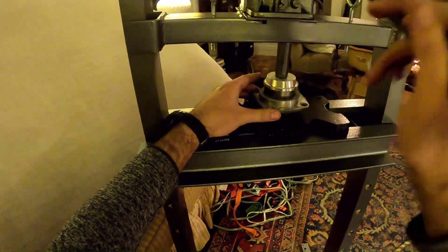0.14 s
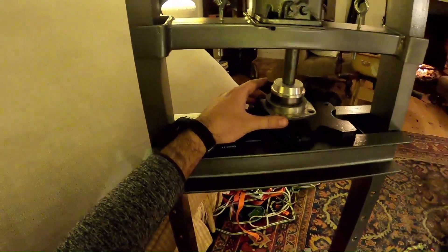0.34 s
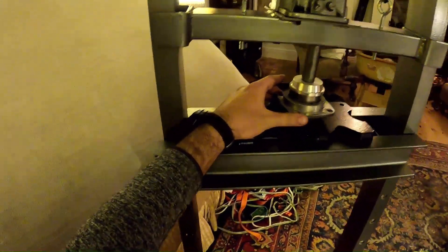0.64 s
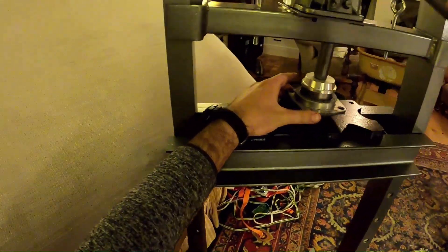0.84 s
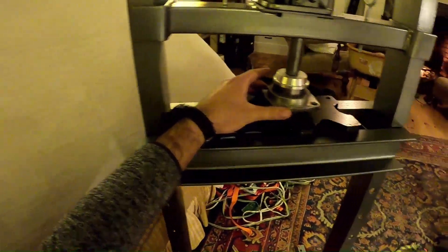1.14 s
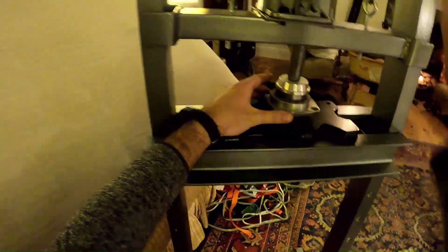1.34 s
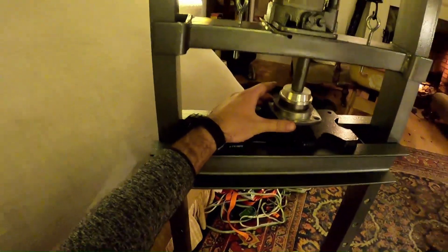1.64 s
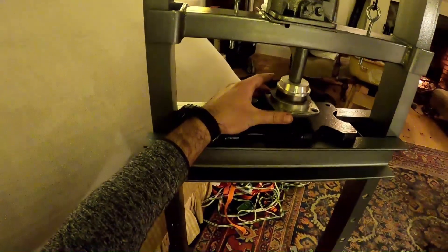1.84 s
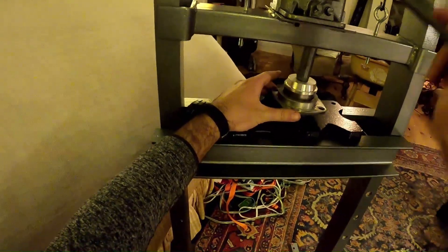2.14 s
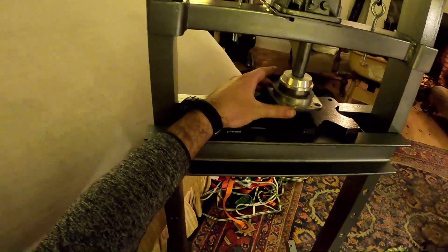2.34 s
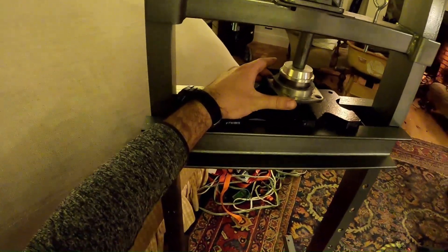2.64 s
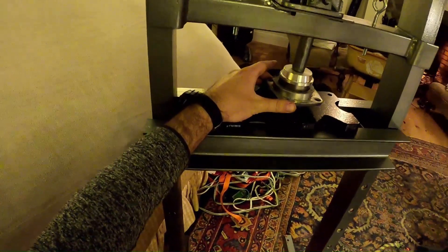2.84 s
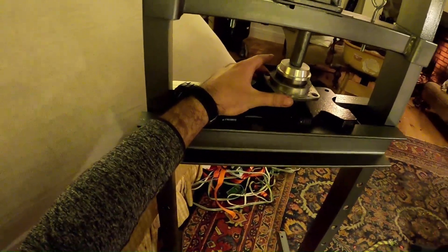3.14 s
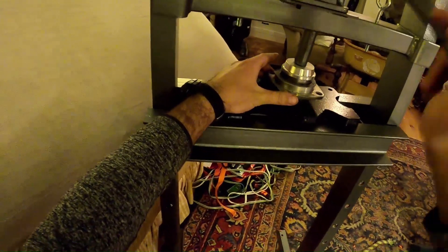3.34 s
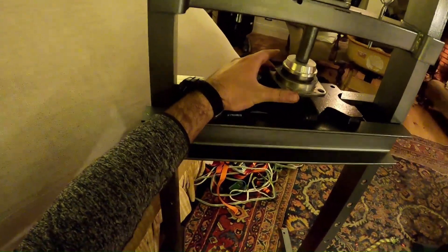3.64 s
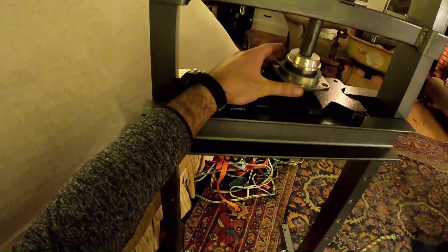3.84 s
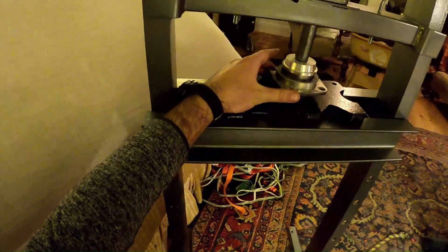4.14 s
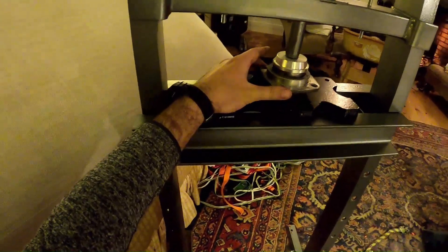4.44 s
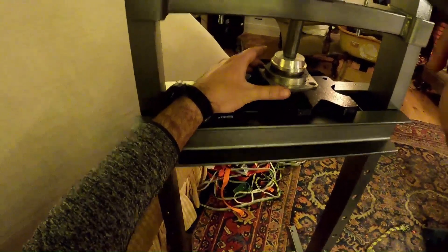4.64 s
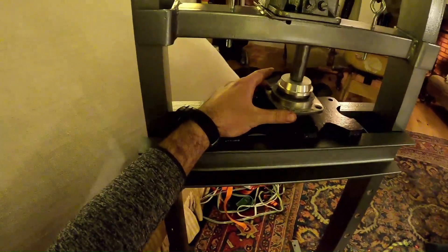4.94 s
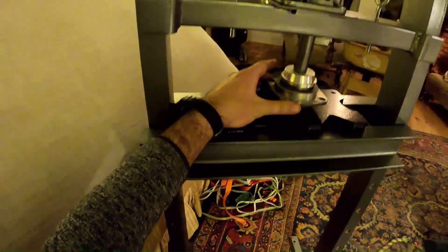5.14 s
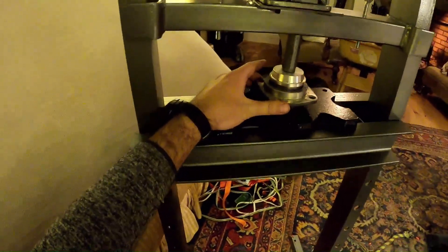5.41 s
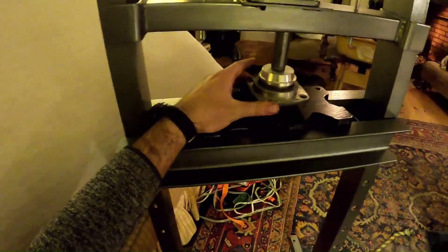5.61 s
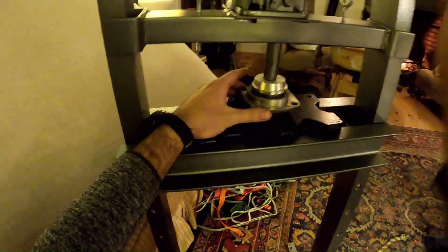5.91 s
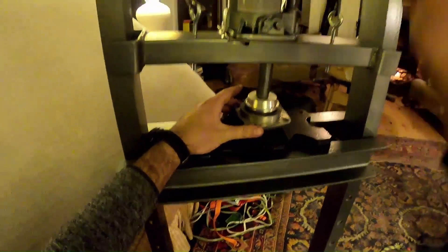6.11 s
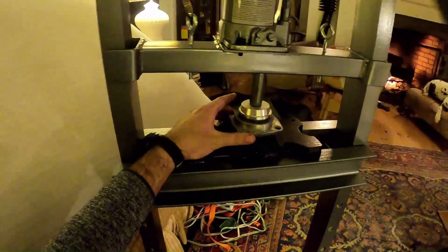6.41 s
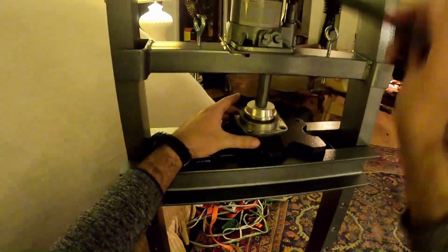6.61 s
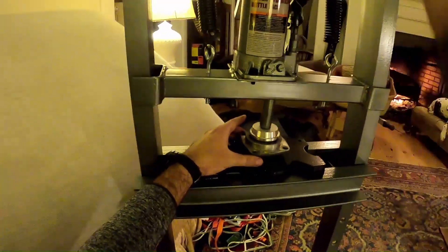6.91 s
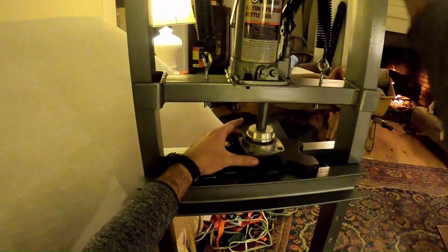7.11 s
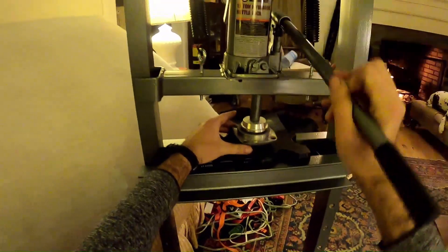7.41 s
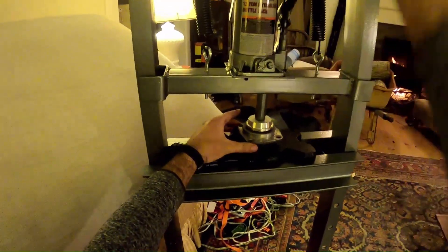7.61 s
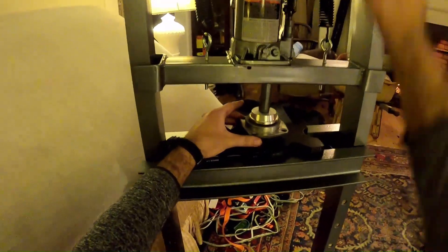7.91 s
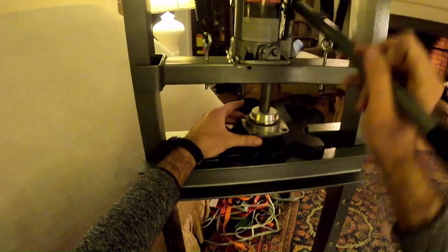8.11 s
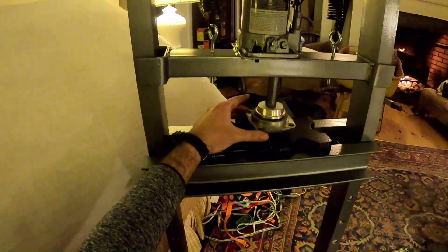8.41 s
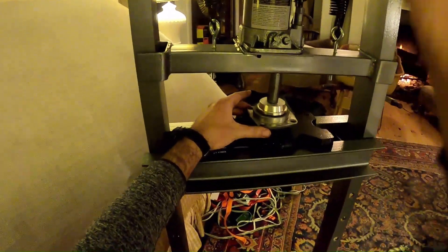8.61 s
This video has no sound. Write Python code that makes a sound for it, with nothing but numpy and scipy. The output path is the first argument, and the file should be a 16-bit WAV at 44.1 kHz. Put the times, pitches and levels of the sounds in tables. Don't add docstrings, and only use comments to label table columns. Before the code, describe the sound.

Close up in a furnished room, a bottle jack on a steel press is pumped by hand. Each stroke starts with a bright double clack, then a dull thud into the frame, a loose handle clack with a rattle, and a dry clack at the bottom. Faint oil hiss, thin whistles and low floor thumps run beneath, over quiet room tone. Stereo, treble brighter on the right.

```python
import sys
import numpy as np
from scipy import signal
from scipy.fft import rfft, irfft
from scipy.io import wavfile
from scipy.ndimage import uniform_filter1d

SR = 44100
rng = np.random.default_rng(int(sys.argv[2]) if len(sys.argv) > 2 else 0)


def attenuation_scalar(level_db):
    decades = np.asarray(level_db, float) / 20
    return 10 ** decades


def digitize_waveform(pressure):
    field = np.atleast_2d(pressure).T
    bounded = np.clip(field, -1, 1)
    quanta = np.round(bounded * 32767).astype(np.int16)
    wavfile.write(sys.argv[1], SR, quanta)


N = 386302

# frequency in Hz, density in dB per Hz.
ROOM_TONE = [(12, -11), (20, 6), (59, 24.5), (433, 8), (603, 18.5), (1270, 13), (1830, -14), (3970, -32),
             (8620, -41), (15000, -40)]
# time in seconds, level in dB.
OIL_FLOW = [(0.0, -35.5), (0.24, -49.5), (0.85, -52), (2.14, -48.5), (2.63, -53.5), (2.78, -46),
            (4.05, -52.5), (5.85, -59), (6.07, -36.5), (6.29, -55), (7.98, -48.5), (8.15, -42),
            (8.44, -53.5), (8.76, -36)]
# time in seconds, clack in dB, bounce delay in ms, bounce clack in dB, bounce blow in dB.
TOPS = [(0.0155, -13.5, 9.6, -15, -34), (.6805, -13, 12.1, -15, -38), (1.3339, -32.5, 8.5, -27, -40),
        (1.9962, -12, 12.2, -14.5, -35.5), (2.6162, -12.5, 11, -13.5, -35.5),
        (3.2607, -12.5, 11.2, -14.5, -37.5), (3.8912, -14, 12.1, -13, -35.5), (4.5363, -13, 13, -18, -36.5),
        (5.2081, -12.5, 11.5, -20, -33.5), (5.867, -12, 13, -15, -31.5), (6.5279, -15.5, 28.3, -11.5, -33),
        (7.2413, -14, 9.7, -13.5, -32), (7.934, -14, 5.4, -17, -32), (8.6141, -12.5, 10.5, -14, -34.5)]
# time in seconds, clack in dB, frame blow in dB, contact in ms.
THUDS = [(.209, -19, -28.5, 5.6), (0.985, -30.5, -41.5, 8.1), (.997, -26.5, -44, 5.9),
         (1.549, -28, -31.5, 3), (2.1835, -21.5, -31, 12), (2.817, -24, -30.5, 5.1),
         (3.4545, -19.5, -32, 4.9), (4.156, -22, -38.5, 20), (4.7554, -37, -40, 7.5),
         (5.4899, -26.5, -47, 23), (6.0974, -48, -35.5, 3.6), (6.7845, -50, -37, 3),
         (7.5336, -28, -40.5, 4), (8.1323, -22, -24.5, 13), (8.1582, -21.5, -30.5, 4.1)]
# time in seconds, clack in dB, frame blow in dB, contact in ms, graze in dB.
CATCHES = [(.28, -14.5, -36, 9.5, -33), (1.039, -21.5, -44, 5.7, -33), (1.6148, -13, -41, 7, -39),
           (2.2456, -16, -39, 5.9, -30), (2.8795, -13.5, -46.5, 7, -30), (3.5103, -12, -38, 7.7, -33),
           (4.1662, -17.5, -46, 8.2, -41), (4.8084, -14.5, -44.5, 5.9, -24.5),
           (5.5009, -16.5, -40.5, 5.9, -39), (6.159, -13.5, -39.5, 5.9, -27),
           (6.8441, -17.5, -38.5, 8.4, -34), (7.5424, -16.5, -36, 15, -39), (8.1973, -16, -33.5, 8.9, -28)]
# time in seconds, clack in dB, frame blow in dB, contact in ms.
RATTLES = [(.3505, -23, -43.5, 7.3), (1.395, -26.5, -45, 5.6), (1.6551, -30, -43, 13),
           (1.676, -25, -47.5, 9), (2.2942, -26, -44.5, 6.5), (2.9306, -23, -45.5, 8.1),
           (3.558, -24, -44.5, 9.2), (4.1988, -28, -46.5, 15), (4.8417, -19.5, -41, 4.5),
           (5.5365, -18.5, -42.5, 5), (6.2044, -17, -45.5, 4.1), (6.8861, -20.5, -41, 6.2),
           (7.98, -27, -45, 6.5), (8.181, -30, -51, 4.1), (8.2424, -17.5, -36, 3.1),
           (8.2488, -25.5, -40.5, 22)]
# time in seconds, clack in dB, frame blow in dB, socket ping in dB.
BOTTOMS = [(0.458, -21, -45.5, 4), (1.1431, -21, -43.5, 0), (1.7687, -15, -42.5, 3), (2.3747, -28, -46, 9),
           (2.9994, -14.5, -43.5, 2.5), (3.6449, -13, -44, 2.5), (4.265, -17, -44, 0),
           (4.9019, -18, -48.5, 5.5), (5.5925, -13, -50.5, 5), (6.2781, -14.5, -41, -4),
           (6.9723, -11.5, -39.5, 0), (7.6392, -28.5, -44.5, 4), (8.3348, -22.5, -40, 5)]
# time in seconds, clack in dB.
TICKS = [(0.6351, -48), (.9377, -43), (1.2606, -46), (1.9149, -49), (1.9913, -39), (2.5727, -43),
         (3.178, -45.5), (3.254, -33.5), (3.8132, -50), (3.887, -39), (4.3285, -40), (4.3809, -45),
         (5.109, -59), (5.1331, -37.5), (5.2025, -28.5), (5.7348, -44.5), (5.8084, -48), (5.8153, -48),
         (6.488, -52), (6.5003, -45.5), (7.236, -32), (7.7677, -43.5), (8.608, -30)]
# time in seconds, clack in dB.
SLACK = [(0.641, -27.5), (1.9595, -29), (2.5811, -29.5), (3.2214, -37), (3.848, -31.5), (4.4994, -30.5),
         (5.1698, -29), (5.83, -29), (6.5115, -34.5), (7.1972, -35), (7.8913, -33), (8.571, -40)]
# frequency in Hz, width in Hz, level in dB.
LINKAGE = [(1950, 390, -12), (2360, 222, 1.5), (2514, 187, 2), (3176, 560, -0.5), (4056, 486, 2.5),
           (4447, 700, -2.5), (5190, 720, -8), (5980, 500, -5.5), (6590, 1100, -13.5), (8590, 900, -18.5),
           (10580, 420, -29), (12900, 4300, -37)]
# frequency in Hz, T60 in seconds, level in dB at the top, in the socket, at the bottom.
TUBE = [(2400, 0.31, -8, -2, -6), (2570, 0.3, -5.5, 0, -6.5), (3280, .3, -9, -9.5, -6),
        (3570, 0.16, -9.5, -12, 2), (3820, 0.33, -6.5, -1, -3), (4190, 0.42, -3, -8, -8.5),
        (4250, 0.35, -7.5, -7, -5), (5100, .26, -6, -10, -13.5), (5850, 0.17, 0, 3, 4),
        (6860, .21, -3, 4, 7), (7910, .2, 5, 8, 7), (9690, .16, 2, 17, 7), (11360, .12, 13.5, -1, 6),
        (12280, .1, 11, 3, 12)]
# frequency in Hz,
# level in dB, T60 in seconds.
FRAME_MODES = [(62.6, -3.5, 0.36), (83, -6, 0.43), (135.3, -23.5, 0.35), (189, -7.5, 0.32),
               (250, -4, 0.36), (295.7, -5.5, 0.29), (417, -7.5, 0.21), (550, -9, 0.58), (635, 5, 0.057),
         (780, 3.5, 0.24), (844, -8, 1), (950, 0, 0.42), (990, -10, 0.53), (1213, 6.5, 0.089),
         (1262, -0.5, 0.24), (1450, -4.5, 0.55), (1663, -8.5, 0.23), (1600, 4, 0.18)]
# frequency in Hz, level in dB, T60 in seconds.
BED = [(297.6, -6, 0.03), (458, -12.5, 0.057), (602.6, -1, 0.037), (712, -7, 0.077), (903, 3, 0.031),
       (1030, 4, 0.017), (1178, -2.5, 0.03), (1320, 2.5, 0.028), (1534, -4.5, 0.04), (1774, -6, 0.06),
       (1934, -4, 0.027), (2210, -4.5, 0.032), (2763, -2.5, 0.022), (3276, -2.5, 0.0053)]
# frequency in Hz, level in dB, T60 in seconds.
RAM = [(290, -11.5, 0.21), (372, -4.5, 0.11), (428, -13.5, 0.069), (1400, -5, .2), (1543, 1, .062),
       (1650, 6.5, 0.15), (1920, -12, .05), (2104, -4.5, 0.1), (2620, -0.5, 0.19), (2960, 5, 0.11),
       (3350, 3, 0.044)]
# frequency in Hz, T60 in seconds.
ROOM_T60 = [(200, 0.5), (1000, 0.39), (3000, 0.51), (8000, 0.4), (12000, 0.29)]
# time in seconds, level in dB, T60 in seconds.
THUMPS = [(0.23, -27, 0.48), (0.672, -43, 0.41), (0.99, -48.5, 1.1), (1.574, -28, 0.52), (2.216, -26, 0.36),
          (2.839, -30.5, 0.55), (3.274, -53, 1), (3.482, -29, 0.47), (4.521, -50, 0.62), (4.79, -48, 0.88),
          (5.196, -38, 0.3), (5.862, -49, 0.42), (6.558, -48, 0.47), (6.843, -41, 0.51), (7.928, -65, 2.1),
          (8.149, -27, 0.48)]
# start and end in seconds, first and last frequency in Hz, level in dB.
WHISTLES = [(0.26, 0.413, 1780, 1790, -47), (.46, .6, 1454, 1490, -52), (1.422, 1.575, 1450, 1710, -53),
            (2.41, 2.58, 1306, 1290, -56), (3.03, 3.166, 1500, 1520, -52), (3.276, 3.438, 1595, 1620, -50),
            (5.94, 6.13, 1276, 1624, -46), (6.11, 6.16, 1700, 1710, -57), (6.697, 6.83, 1510, 1740, -52),
            (7.3, 7.523, 1460, 1400, -55.5), (7.652, 7.857, 1465, 1500, -51.5),
            (7.993, 8.12, 1400, 1400, -55)]
# frequency in Hz, gain in dB.
HOUSING = [(10200, -2), (10900, -17.5), (14500, -18), (15300, -19), (15800, -45)]
# frequency in Hz, gain in dB.
LEFT_DB = [(25, -15.5), (90, -11), (180, -1), (600, 1.6), (1300, -1.3), (2500, -5.4), (4700, -11.3),
           (9000, -12), (11000, -8), (12200, 0)]
# frequency in Hz, lead in radians.
LEFT_TURN = [(90, .3), (180, 1.0), (300, 1.2), (1500, 1.22), (4700, 1.44), (6000, 2.2), (10000, 2.4),
             (13000, 3.2)]
# frequency in Hz, likeness from 0 to 1.
LEFT_SAME = [(40, .65), (110, .55), (240, .98), (3500, .96), (5000, .75), (9000, .55), (11000, .3),
             (15000, .2)]


def evened(x):
    return x / np.sqrt(np.mean(x ** 2) + 1e-20)


def read(points, hz):
    f, value = np.transpose(points)
    return np.interp(np.log(hz + 1), np.log(f + 1), value)


def add(mix, s, sound):
    part = mix[round(s * SR):][:len(sound)]
    part += sound[:len(part)]


def coloured(points):
    hz = np.fft.rfftfreq(N, 1 / SR)
    return evened(irfft(rfft(rng.standard_normal(N)) * attenuation_scalar(read(points, hz)), N))


def room_tone():
    return attenuation_scalar(-56.5) * np.array([coloured(ROOM_TONE), coloured(ROOM_TONE)])


def oil_hiss():
    s, db = np.transpose(OIL_FLOW)
    hiss = coloured([(300, -8.0), (550, -22.5), (1000, 2.5), (1500, 3.0), (2000, -9.5), (5000, -17), (9000, -37)])
    return attenuation_scalar(np.interp(np.arange(N) / SR, s, db) - 4) * hiss


def contact(place, s, clack_db, blow_db, ping_db, ms, room_db):
    return place, s, clack_db, blow_db, ping_db, ms, room_db


def contacts():
    top, socket, bottom = range(3)
    hits = [contact(bottom, s, db, blow_db, ping_db=0.5, ms=ms, room_db=-19)
            for s, db, blow_db, ms in THUDS]
    for s, db, after_ms, bounce_db, blow_db in TOPS:
        bounce_s = s + after_ms / 1000
        hits += [contact(top, s, db, db - 24.5, ping_db=-0.8, ms=3.46, room_db=-12),
                 contact(top, bounce_s, bounce_db, blow_db, ping_db=-2, ms=3.34, room_db=-15)]
    for s, db, blow_db, ms, graze_db in CATCHES:
        hits += [contact(socket, s, db, blow_db, ping_db=-3, ms=ms, room_db=-16.5),
                 contact(socket, s - .0098, graze_db, graze_db - 16, ping_db=2, ms=15, room_db=-19)]
    hits += [contact(socket, s, db, blow_db, ping_db=-3, ms=ms, room_db=-17)
             for s, db, blow_db, ms in RATTLES]
    hits += [contact(bottom, s, db, blow_db, ping_db=ping_db, ms=4.4, room_db=-18)
             for s, db, blow_db, ping_db in BOTTOMS]
    hits += [contact(top, s, db, db - 25, ping_db=-1.5, ms=9.2, room_db=-13) for s, db in SLACK]
    hits += [contact(top, s, db, db - 12.5, ping_db=7.5, ms=6.1, room_db=-18) for s, db in TICKS]
    return hits


def whitened(x, share):
    z = rfft(x)
    return z / (abs(z) + 0.45 * abs(z).mean(-1, keepdims=True)) ** share


def clack(db, ping_db, ms, dull_db, chance):
    t, hz = np.arange(2048) / SR, np.fft.rfftfreq(2048, 1 / SR)
    attack = np.minimum(t / 0.00039, 1)
    scrape = chance * abs(chance) ** 0.2 * attack * attenuation_scalar(-9 * t * 1000 / ms)
    body = power = 0
    for k, (f, width, level_db) in enumerate(LINKAGE):
        flat_db = ping_db * np.interp(f, [2400, 2600, 3100], [1.6, .3, -.3])
        varied_db = 2.47 * chance[0, -1 - k]
        soft_db = dull_db * max(np.log2(f / 4100), 0)
        mode = attenuation_scalar(level_db + flat_db + varied_db + soft_db) / (1 + 2j * (hz - f) / width)
        body = body + (-1) ** k * mode
        power = power + abs(mode) ** 2
    x = irfft(whitened(scrape, 0.56) * body)
    smooth = irfft(np.sqrt(power) * body / abs(body))
    x *= attenuation_scalar(db) / np.sqrt(uniform_filter1d(x ** 2, 100).max(-1, keepdims=True))
    return x, smooth * np.linalg.norm(x[0]) / np.linalg.norm(smooth)


def blow(db, chance):
    t = np.arange(2048) / SR
    swell = (t / .005) ** 0.53 * np.exp(-t / 0.0052)
    spectrum = whitened((0.054 + chance * abs(chance)) * swell, 0.51)
    heard = abs(spectrum)[20:80]
    return attenuation_scalar(db) * irfft(spectrum) / np.sqrt(np.mean(heard ** 2))


def rings(modes, length_s):
    t = np.arange(round(length_s * SR)) / SR
    x = 0
    for hz, db, t60 in modes:
        sine = np.sin(2 * np.pi * (hz * t + rng.random()))
        x = x + attenuation_scalar(db - 60 * t / t60) * sine / np.sqrt(t60)
    return x / np.linalg.norm(x)


def room(x):
    hz, t, z = signal.stft(rng.standard_normal((2, SR * 2 // 5)), SR, nperseg=128)
    tail = signal.istft(z * attenuation_scalar(-60 * t / read(ROOM_T60, hz)[:, None]), SR, nperseg=128)[1]
    tail *= np.minimum(np.arange(tail.shape[1]) / SR / 0.0092, 1)
    return signal.fftconvolve(x[None], tail / np.linalg.norm(tail[0]), axes=1)[:, :N]


def jack():
    direct, loads = np.zeros((2, N)), np.zeros(N)
    blows, sent = np.zeros((3, N)), np.zeros((3, N))
    hits = contacts()
    chances = rng.standard_normal((len(hits), 2, 2048))
    for k, (hit, chance) in enumerate(zip(hits, chances)):
        place, s, clack_db, blow_db, ping_db, ms, room_db = hit
        is_thud = k < len(THUDS)
        dull_db = -22 if is_thud else 0
        sound, smooth = clack(clack_db, ping_db, ms, dull_db, chance)
        add(direct[0], s, sound[0])
        add(direct[1], s, sound[1])
        add(sent[place], s, attenuation_scalar(room_db) * smooth)
        add(blows[k % 3], s, blow(blow_db, chance[1]))
        if is_thud:
            add(loads, s, blow(blow_db, chance[0]))
    out = direct + attenuation_scalar(29) * signal.oaconvolve(loads, rings(RAM, .3))[:N]
    for place, (push, send) in enumerate(zip(blows, sent)):
        frame = attenuation_scalar(29.5) * signal.oaconvolve(push, rings(FRAME_MODES, .5))[:N]
        knock = attenuation_scalar(35.0) * signal.oaconvolve(push, rings(BED, 0.11))[:N]
        tube_modes = [(hz, db[place], t60) for hz, t60, *db in TUBE]
        tube = attenuation_scalar(6.5) * signal.oaconvolve(send, rings(tube_modes, 0.45))[:N]
        out = out + frame + knock + tube + room(attenuation_scalar(4.5) * send + attenuation_scalar(-4.0) * knock)
    return out


def thumps(own):
    out, t = np.zeros(N), np.arange(SR // 2) / SR
    for (s, db, t60), turn in zip(THUMPS, rng.random((len(THUMPS), 1))):
        swing = np.sin(2 * np.pi * (33 * t - own * turn))
        swing += 0.55 * np.sin(2 * np.pi * (38 * t + own * turn))
        swing += 0.071 * np.sin(2 * np.pi * 27 * t)
        swing += 0.35 * np.sin(2 * np.pi * (70 + 14 * turn) * t) * np.exp(-t / 0.25)
        onset = 1 - np.exp(-t / 0.041)
        add(out, s - .015, attenuation_scalar(db + 5.0 - 60 * t / t60) * onset * swing)
    return out


def valve_whistles():
    out = np.zeros(N)
    r = np.exp(-np.pi * 45 / SR)
    for start, end, from_hz, to_hz, db in WHISTLES:
        hz = np.linspace(from_hz, to_hz, round((end - start) * SR))
        turn = np.exp(2j * np.pi * np.cumsum(hz) / SR)
        fuzz = rng.standard_normal(len(hz)) / turn
        for _ in range(2):
            fuzz = signal.lfilter([1], [1, -r], fuzz)
        add(out, start, attenuation_scalar(db) * evened((turn * fuzz).real) * signal.windows.tukey(len(hz), .4))
    return out


def scene():
    air, oil = room_tone(), oil_hiss()
    return air + oil + jack() + np.array([thumps(0), thumps(1.0)]) + valve_whistles()


def roll_off(x):
    return signal.sosfilt(signal.butter(12, 15850, fs=SR, output="sos"), x)


def record(dry):
    hz = np.fft.rfftfreq(N, 1 / SR)
    shared, other = rfft(dry) * attenuation_scalar(read(HOUSING, hz))
    same = np.clip(read(LEFT_SAME, hz), 0, 1)
    left = same * shared + 1j * np.sqrt(1 - same ** 2) * other
    left = left * attenuation_scalar(read(LEFT_DB, hz)) * np.exp(1j * read(LEFT_TURN, hz))
    return roll_off(irfft(np.array([left, shared]), N))


dry = scene()
out = record(dry)
digitize_waveform(out)
```